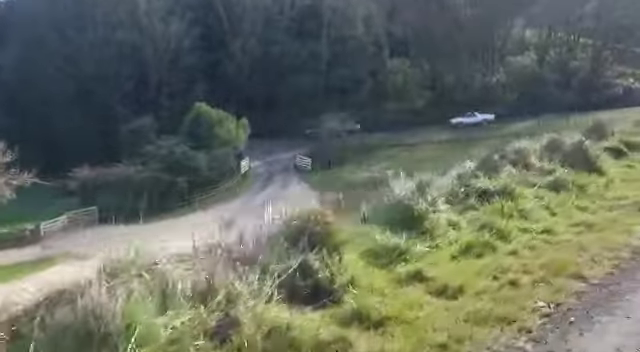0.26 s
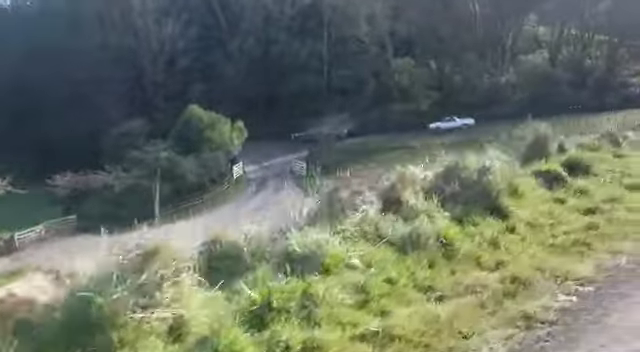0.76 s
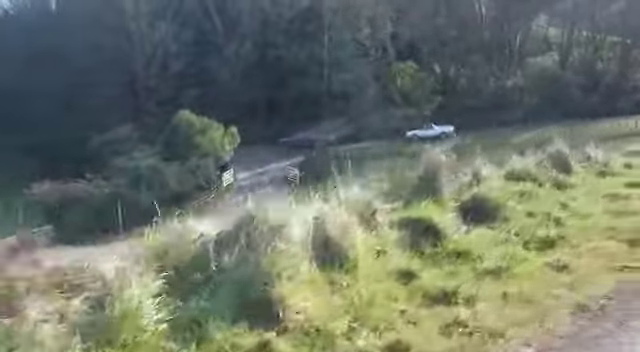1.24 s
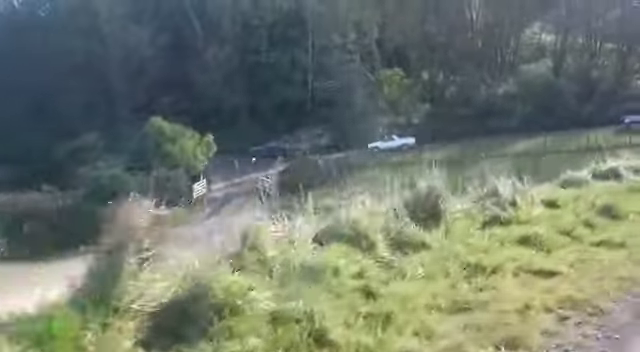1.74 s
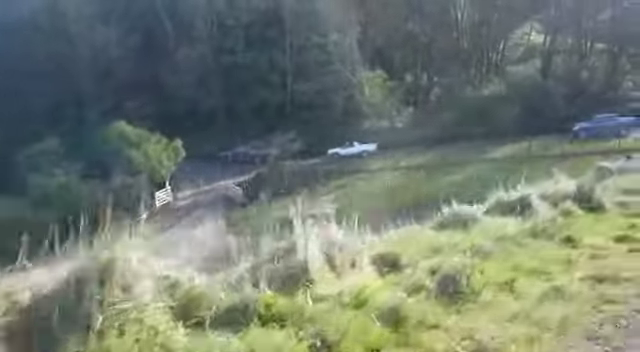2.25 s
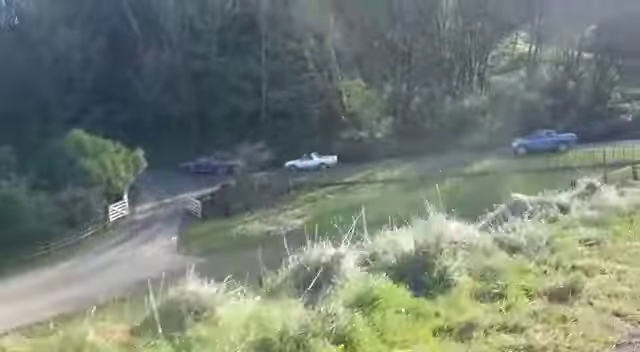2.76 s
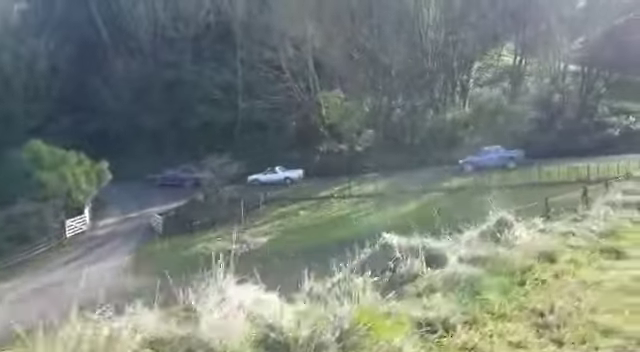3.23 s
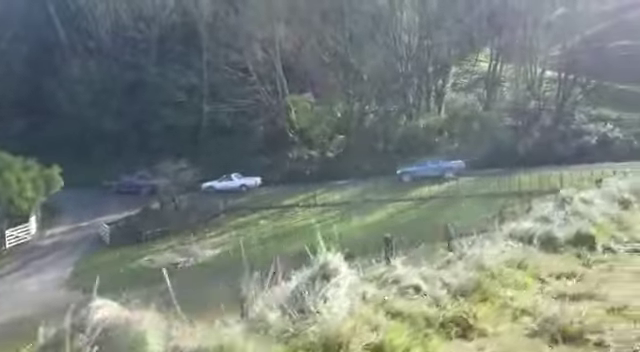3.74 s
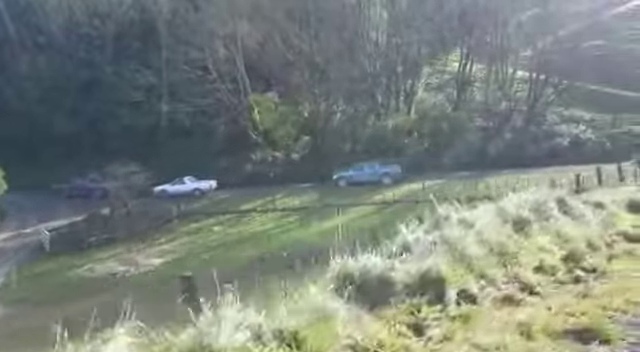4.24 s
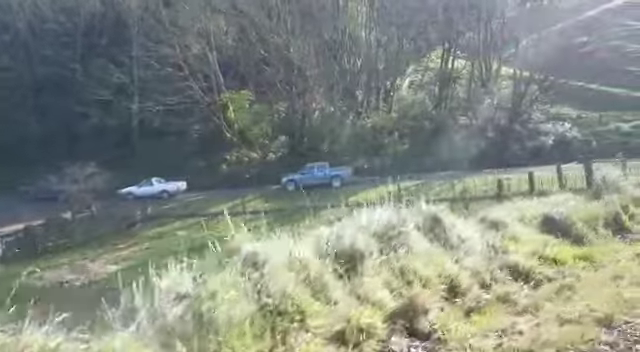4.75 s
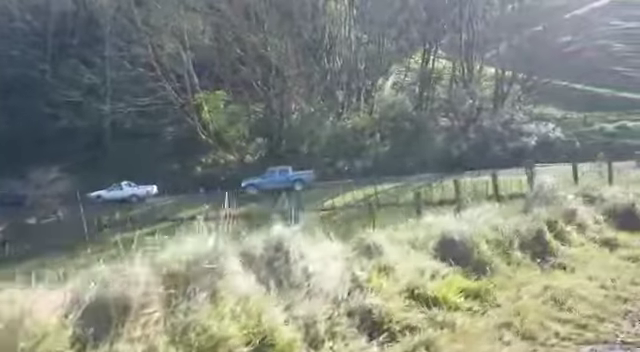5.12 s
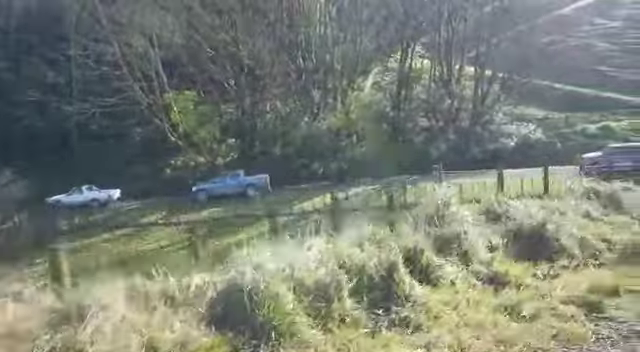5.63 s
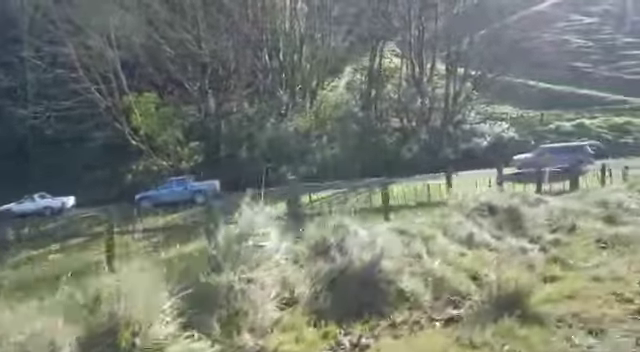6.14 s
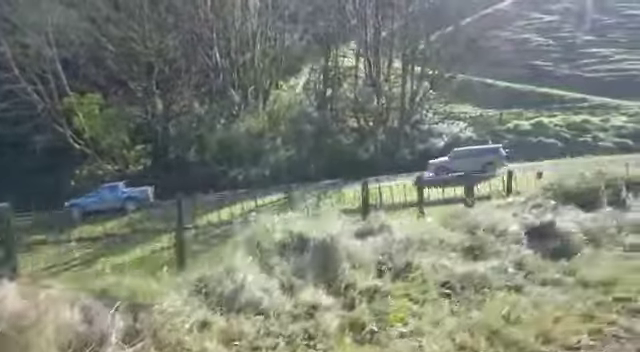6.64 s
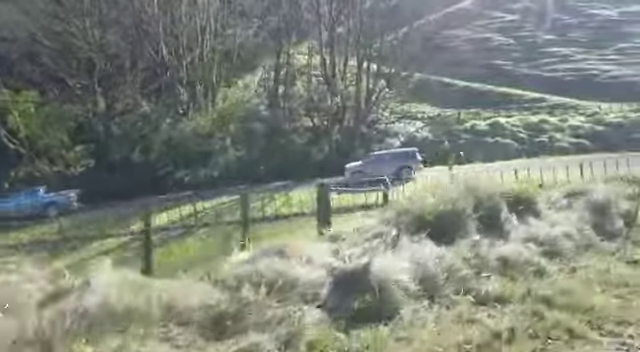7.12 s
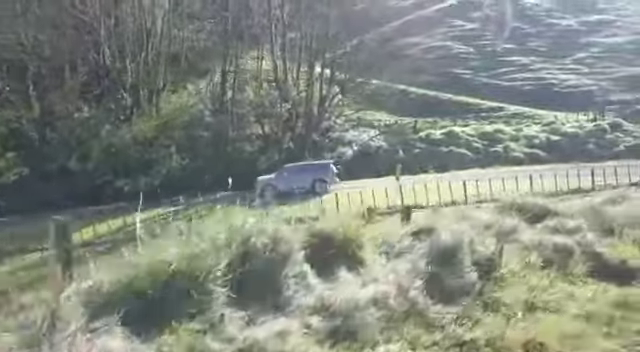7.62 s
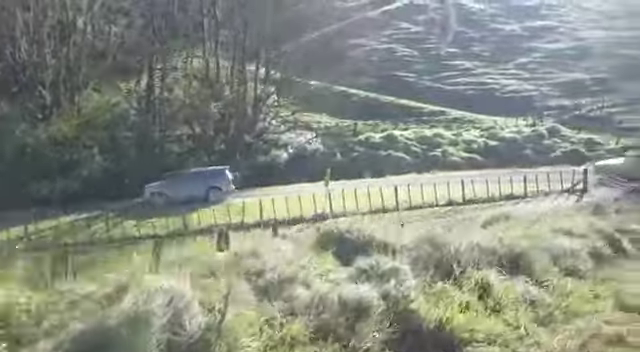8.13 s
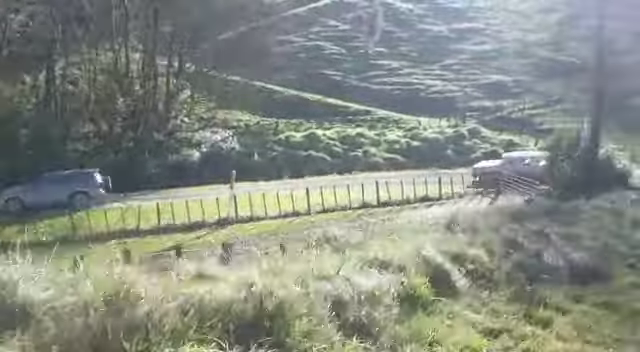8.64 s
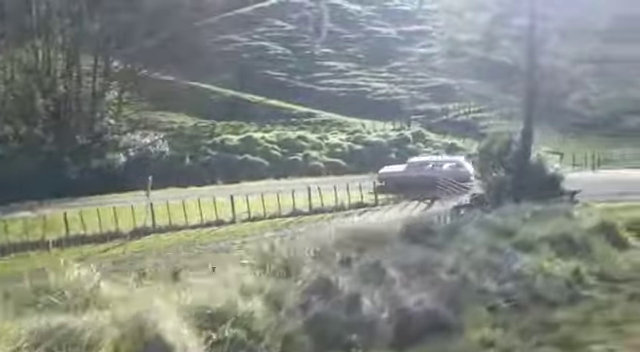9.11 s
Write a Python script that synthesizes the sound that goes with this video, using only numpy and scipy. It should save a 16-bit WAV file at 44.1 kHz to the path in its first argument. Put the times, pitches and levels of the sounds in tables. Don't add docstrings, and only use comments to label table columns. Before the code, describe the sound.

A rough broken-exhaust engine throbs throughout, low and boomy, its bangs coming in lumpy groups with short gaps, then shifting to a somewhat quicker, barkier beat past the middle. Loose parts rattle after each bang, grit pings the underside, an occasional bracket clinks, and a scraping rub comes and goes in the second half. Heard from inside the enclosed cabin over tyre rumble and airy hiss.

```python
import sys
import numpy as np
from scipy import signal
from scipy.fft import rfft, irfft, next_fast_len
from scipy.io import wavfile
from scipy.ndimage import uniform_filter1d

SR = 44100
rng = np.random.default_rng(int(sys.argv[2]) if len(sys.argv) > 2 else 0)


def pcm_store(signal):
    levels = np.round(np.clip(np.atleast_2d(signal), -1, 1) * 32767)
    wavfile.write(sys.argv[1], SR, levels.astype(np.int16).T)


def volts(x):
    e = np.asarray(x, float) / 20
    return 10 ** e


N = 413216


def unit(x):
    return x / np.sqrt(np.mean(x ** 2) + 1e-20)


def filtered(x, response):
    m = next_fast_len(N + SR // 2, True)
    hz = np.fft.rfftfreq(m, 1 / SR)
    gain = np.interp(hz, hz[::8], response(hz[::8]))
    return irfft(rfft(x, m) * gain, m)[:N]


def shape(points):
    f, db = np.transpose(points)
    return lambda hz: volts(np.interp(np.log(hz + 1), np.log(f), db, -120, -120))


def modes(rows, sense=-1):
    def response(f):
        total = 0
        for k, (centre, width, db) in enumerate(rows):
            peak = 1j * f * width / (centre * centre - f * f + 1j * f * width)
            total = total + sense ** k * volts(db) * peak
        return total
    return response


def blows(times, sizes):
    return np.bincount(np.round(times * SR).astype(int), sizes, N)[:N]


def swell(times, sizes, rise, fall):
    t = np.arange(SR // 4) / SR
    hump = (1 - np.exp(-t / rise)) * np.exp(-t / fall)
    power = signal.fftconvolve(blows(times, sizes ** 2), (hump / hump.max()) ** 2)[:N]
    return np.sqrt(np.abs(power))


def rush(response, patchy_db, wide=6, long=8):
    z = signal.stft(rng.standard_normal(N + 512), nperseg=256)[2]
    field = uniform_filter1d(rng.standard_normal(z.shape), wide, axis=0)
    field = uniform_filter1d(field, long, axis=1)
    noise = signal.istft(z * volts(patchy_db * unit(field)), nperseg=256)[1][:N]
    return unit(filtered(noise, response))


def gains(rows):
    s, *levels = np.transpose(rows)
    return [volts(np.interp(np.arange(N) / SR, s, db, left=-120)) for db in levels]


def held(rows, edge_s):
    t = np.arange(0, N / SR, .002)
    on = np.array([np.clip(np.minimum(t - a, b - t) / edge_s + .5, 0, 1) for a, b, *_ in rows])
    return [np.interp(np.arange(N) / SR, t, gain) for gain in volts(np.array(rows)[:, 2:]).T @ on]


def firings():
    # time_s, cycles_done
    crank = [(0.0, -0.633), (0.561, 2), (0.980, 4), (1.607, 7), (2.231, 10), (2.648, 12), (2.862, 13),
             (3.271, 15), (3.692, 17), (4.320, 20), (4.523, 21), (5.3495, 25), (5.5531, 26),
             (5.6976, 26.75), (7.309, 35.75), (8.0302, 39.75), (8.5782, 42.75), (9.393, 47.25)]
    # first_s, last_s, boom_db, bark_db, rattle_db
    spells = [(0.1071, 2.2041, -4, -4.5, -55.5), (0.1346, 2.6485, -2.6, -1.6, -53),
              (0.187, 2.6998, -1, -2, -56), (2.334, 2.546, -2, -4, -58), (2.8622, 5.5531, -1.5, -3, -58),
              (2.8889, 3.0924, -3, -2.5, -52.5), (2.9145, 3.3249, -5, -3.5, -53.5),
              (2.9388, 4.1909, -3, -5, -54), (3.1677, 3.3767, -9, -5, -55), (3.6369, 4.2682, -1.4, -3, -54),
              (4.0326, 4.4471, -2.5, -4, -54), (4.3713, 5.6021, -3, -2.5, -60.5),
              (4.397, 5.6259, -2, -11, -56.5), (4.7566, 4.9625, -3.5, -5.5, -55),
              (5.6976, 7.1293, -4, -0.8, -56), (5.7427, 7.1772, -5, -0.6, -52.5),
              (7.3547, 8.259, -2.5, -1.1, -52), (5.8062, 6.1681, -8, -7, -58),
              (6.5243, 7.9596, -10, -4, -55.5), (8.1425, 8.6886, -7, -4.5, -52.5),
              (7.309, 9.3026, -4, -1.8, -54), (8.3487, 8.7115, -2.5, -3, -52),
              (9.0749, 9.257, -4.5, -2, -56), (8.9626, 9.3241, -6, -4.5, -53)]
    # time_s, boom_db, bark_db, rattle_db
    strays = [(0.0537, -7, -16.5, -56.5), (0.2671, 0.5, -6.5, -50.5), (0.5848, -10, 0.5, -49.5),
              (1.0062, -9, -1.5, -50), (1.083, -12, -10.5, -75), (1.3152, -1.5, -5, -53),
              (1.6331, 0.5, -1, -50), (1.943, 0.5, -7, -54), (2.2576, -2.5, -3, -49),
              (2.4093, -11, -4, -69.5), (2.5719, 0, -2.8, -50), (2.621, -6, -3.5, -53.5),
              (2.8337, -9, -7, -69), (3.0144, -2.5, -2.7, -65), (3.4028, -2.5, -7.5, -53),
              (3.4285, -7.5, -4, -68), (3.533, -14.5, -2.5, -79), (3.718, -4, -1.5, -48.5),
              (5.2961, -13, -2.7, -67), (5.5779, -5, -8.5, -54), (5.8517, -13, -28, -75),
              (6.2149, -4.5, 0, -55), (6.483, -5, -5.5, -72), (7.1082, -9.6, -10, -61),
              (7.5588, -10, -7.5, -77), (7.8268, -9, -3, -56), (8.6426, 0, -2.5, -52.5),
              (8.8974, 0.5, -1.3, -47), (9.0077, -0.5, -3, -48)]
    # boom_db, bark_db, rattle_db
    crowded_db = (-1.5, 0.3, 1.5)
    # boom_db, bark_db, rattle_db
    rested_db = (0.7, -0.3, 0.3)
    # boom_db, bark_db, rattle_db
    scatter_db = (1.0, 0.5, 1.5)
    cylinders = 8
    s, done = np.transpose(crank)
    rows = []
    for first, last, *db in spells:
        a, b = np.interp([first, last], s, done)
        cycles = np.linspace(a, b, round(b - a) + 1)
        rows += [(t, *db) for t in np.interp(cycles, done, s)]
    fired = np.array(sorted(rows + strays))
    position = cylinders * np.interp(fired[:, 0], s, done)
    turns = np.round(np.diff(position, prepend=-cylinders))[:, None]
    change = (turns < 2) * crowded_db + (turns > 3) * rested_db
    change = change + rng.standard_normal((len(fired), 3)) * scatter_db
    return fired + np.pad(change, [(0, 0), (1, 0)])


def exhaust(fired):
    # pitch_hz, width_hz, level_db
    cabins = [
        [(42.6, 6.8, 2), (55.4, 7.4, 17.8), (77, 18.5, 13.5)],
        [(45.8, 6, 10.8), (56.3, 13, 17.7), (74.3, 30.6, 13.1)],
    ]
    # pitch_hz, width_hz, level_db
    pipes = [
        [(150.4, 65.3, 13.2), (187.4, 20.4, 24.8), (202.6, 15, 17.8)],
        [(166.2, 67.6, 17.7), (184, 25.5, 25.6), (200.7, 9.4, 15.8)],
    ]
    # pitch_hz, width_hz, level_db
    plates = [(240.3, 39.5, -3.5), (302.4, 19.7, -1), (350.6, 24, 3.5)]
    slug = lambda hz: -volts(26) / (1 + 1j * hz / 100) ** 2
    bangs = 0
    fast = fired[:, 0] > 5.66
    for part, cabin, pipe in zip((fired[~fast], fired[fast]), cabins, pipes):
        s, boom_db, bark_db, _ = part.T
        bangs = bangs + filtered(blows(s, volts(boom_db)), lambda hz: slug(hz) * modes(cabin)(hz))
        bangs = bangs + filtered(blows(s, volts(bark_db)), lambda hz: slug(hz) * modes(pipe)(hz))
    s, _, bark_db, _ = fired.T
    shake = swell(s, volts(bark_db), rise=0.0088, fall=0.037) + 0.13
    band = lambda hz: hz ** 4 / (hz ** 4 + 285.0 ** 4) / (1 + (hz / 373.0) ** 8)
    panels = lambda hz: modes(plates)(hz) * band(hz)
    return bangs + volts(-44) * shake * rush(panels, patchy_db=1.2)


def trim(fired):
    # pitch_hz, level_db
    loose = [(1950, 0), (2200, 0.5), (2450, -3), (2950, -2), (3250, -1), (3900, -6), (4800, 0),
             (5350, -1.5), (5900, -2.5), (7300, -7)]
    # pitch_hz, level_db per Hz
    buzz_colour = [(1000, -33), (1700, -1.5), (2900, -2), (3570, -7), (5200, -4), (7300, -12.5),
                   (8500, -18), (16000, -16)]
    s, _, _, rattle_db = fired.T
    draw = rng.random((len(s), 5, 4))
    t = np.arange(SR // 16) / SR
    hz, db = np.transpose(loose)[:, (len(loose) * draw[..., :1]).astype(int)]
    hz = hz * (1 + .06 * (draw[..., 3:] - .5))
    age = np.maximum(t - .002 - 0.014 * draw[..., 1:2], 0)
    fade = volts(db - 15 * draw[..., 2:3] - 60 * age / 0.058)
    rings = fade * (1 - np.exp(-age / 0.0041)) * np.sin(2 * np.pi * hz * age)
    where = np.round(s * SR).astype(int)[:, None] + np.arange(len(t))
    loudness = volts(rattle_db)[:, None] * rings.sum(axis=1)
    ring = np.bincount(where.ravel(), loudness.ravel(), N)[:N]
    buzz = rush(shape(buzz_colour), patchy_db=2.5, wide=4, long=5)
    shiver = swell(s + .001, volts(rattle_db), rise=.006, fall=.02)
    return volts(6.5) * ring + volts(-1.5) * shiver * buzz


def road(fired):
    # time_s, rumble_db (shell), roar_db (tyres)
    surface = [(0.0, -23, -47), (0.52, -28, -47.5), (7.91, -28, -47), (9.37, -32.5, -46.5)]
    # pitch_hz, level_db per Hz
    rumble_colour = [(25, -32), (50, -2), (80, -3.5), (105, -15), (140, -11.5), (185, -4), (210, -21),
                     (240, -16), (300, -57.5)]
    # pitch_hz, level_db per Hz
    roar_colour = [(130, -27), (220, -2.5), (267, -2), (349, -3), (400, -6), (706, -4), (1160, -12),
                   (1480, -26), (2200, -37), (2860, -49), (4840, -120)]
    # pitch_hz, level_db
    scrape_colour = [(200, -30), (550, -4), (950, -8), (1150, -0.5), (1750, -3.5), (2100, -11.5),
                     (4000, -50)]
    # pitch_hz, width_hz, level_db
    floor = [(557, 24, -0.5), (650, 110, -13.5), (883, 18, 0), (986, 21, -9.5), (1096, 21, -16.5),
             (1215, 60, 7), (1357, 56, 10), (1560, 52, -9), (1890, 20, -37.5)]
    # start_s, end_s, rubbing_db, hum_db (floor)
    rubs = [(4.03, 4.45, -55, -60), (4.56, 4.72, -56.5, -62), (4.8, 5.44, -60, -58),
            (5.45, 5.8, -51.5, -40), (5.8, 5.94, -55, -50), (5.94, 6.15, -49, -42.5),
            (6.34, 6.52, -47, -44), (6.64, 6.81, -47, -44), (6.81, 6.96, -53, -45), (6.96, 7.34, -49, -46),
            (7.34, 7.53, -46, -47), (7.53, 7.9, -49.5, -50), (7.9, 8.24, -52, -46), (8.24, 8.41, -50, -47),
            (8.48, 8.8, -51, -51), (8.8, 8.98, -48, -42), (9.29, 9.37, -52, -46)]
    rumble, roar = gains(surface)
    rub, hum = held(rubs, edge_s=0.07)
    pan = modes(floor, sense=0.89)
    s, boom_db, _, _ = fired.T
    between = 1 / (1 + .6 * swell(s, volts(boom_db), rise=.004, fall=.03))
    shell = volts(-3.2) * rumble * between * rush(shape(rumble_colour), patchy_db=2.5, long=16)
    drag = 1 + volts(42.5) * rub / 2
    throb = 1 + 0.25 - 2 * 0.25 * between
    through_floor = lambda hz: shape(roar_colour)(hz) * (1.17 + abs(pan(hz)))
    tyres = volts(4.2) * roar * drag * throb * rush(through_floor, patchy_db=1.6)
    scrape = lambda hz: pan(hz) * shape(scrape_colour)(hz)
    rubbing = volts(1.5) * rub * rush(scrape, patchy_db=1.7, wide=2, long=30)
    floor_hum = lambda hz: modes([(255, 11, 0), (551, 14, -8)])(hz) ** 2
    humming = volts(1.5) * hum * rush(floor_hum, patchy_db=2.5)
    return shell + tyres + rubbing + humming


def clanks():
    # time_s, peak_db, pitch_hz
    strikes = [(2.2614, -46, 2140), (2.575, -38, 1975), (5.6244, -35.5, 2150), (6.7101, -41, 2900),
               (7.0065, -40.5, 2456), (8.7011, -40, 2750), (8.9077, -38, 4120)]
    out, t = np.zeros(N + SR), np.arange(SR // 10) / SR
    for s, db, hz in strikes:
        fade = volts(db - 3.5 - 60 * t / 0.08) * (1 - np.exp(-t / .003))
        out[round(s * SR):][:len(t)] += fade * np.sin(2 * np.pi * hz * t)
    return out[:N]


def grit():
    # time_s, peak_db
    stones = [(0.156, -36), (0.2103, -35), (0.2728, -43.5), (0.4165, -37.5), (0.6539, -40), (1.43, -40),
              (2.1809, -39), (2.2077, -41), (2.6482, -41), (3.0873, -37), (3.173, -39), (3.6082, -37),
              (3.693, -40), (3.805, -43), (4.013, -42), (4.041, -40), (4.15, -40), (4.428, -34),
              (4.6381, -38.5), (4.6725, -37.5), (4.6906, -48), (5.6088, -44.5), (8.3774, -45), (8.433, -50),
              (9.3624, -38)]
    # time_s, level_db
    snap = [(0.7652, -12.5)]
    out, t = np.zeros(N + SR), np.arange(SR // 20) / SR
    for (s, db), crackle in zip(stones, rng.standard_normal((len(stones), len(t)))):
        out[round(s * SR):][:len(t)] += volts(db + 8 - 60 * t / 0.014) * crackle
    body = lambda hz: (1j * hz / (2000 + 1j * hz)) ** 2 / (1 + 1j * hz / 7000) ** 4
    glass = lambda hz: 1j * hz / (900 + 1j * hz) / (1 + 1j * hz / 7000) ** 2
    s, db = np.transpose(snap)
    return filtered(out[:N], body) + filtered(blows(s, volts(db)), glass)


def air():
    # pitch_hz, level_db per Hz
    draught_colour = [(12000, -24.5), (14000, -4.5), (15800, 2.5)]
    # pitch_hz, level_db per Hz
    hiss_colour = [(1000, -31), (1700, -3.5), (3000, -4.5), (3570, -8), (5500, -7.5), (8500, -15.5),
                   (16000, -20.5)]
    # start_s, end_s, level_db
    puffs = [(0.97, 1.17, -83), (1.62, 1.78, -88), (2.27, 2.44, -86), (2.57, 2.72, -87), (3.36, 3.46, -86),
             (4.36, 4.46, -88), (5.3, 5.47, -81), (5.57, 5.76, -78), (6.64, 6.75, -77), (7.16, 7.26, -84),
             (7.75, 7.88, -82), (8.18, 8.36, -81), (8.44, 8.56, -85), (8.86, 9.05, -80), (9.345, 9.37, -72)]
    leak = rush(shape(draught_colour), patchy_db=3.5, wide=40, long=2)
    hiss = rush(shape(hiss_colour), patchy_db=.8)
    flow = volts(-96) + held(puffs, edge_s=0.06)[0]
    return volts(11) * flow * leak + volts(-64) * hiss


def scene():
    fired = firings()
    return (exhaust(fired) + trim(fired) + road(fired) + clanks() + grit() + air())[None]


def low_pass(x):
    return signal.sosfilt(signal.butter(12, 15700, fs=SR, output="sos"), x)


def record(dry):
    # pitch_hz, level_db
    port = [(10, 0), (7500, 0), (10100, -7), (11700, -14), (12800, -12), (13600, -3), (14400, -4),
            (14900, -12), (15700, -13)]
    mix = filtered(dry[0], shape(port))[None]
    return low_pass(mix)


dry = scene()
out = record(dry)
pcm_store(out)
```